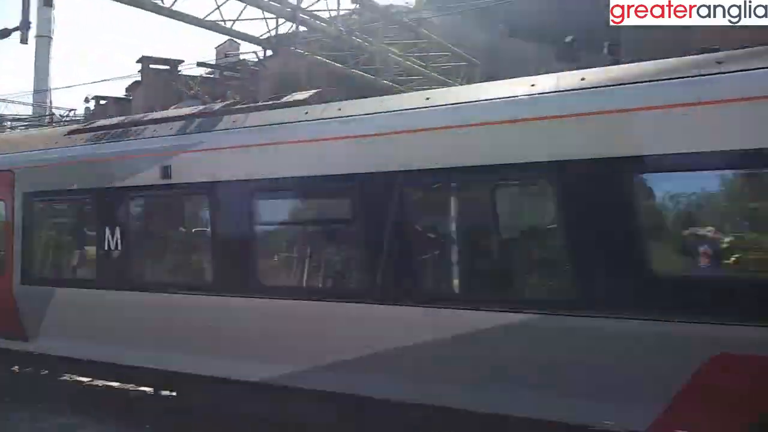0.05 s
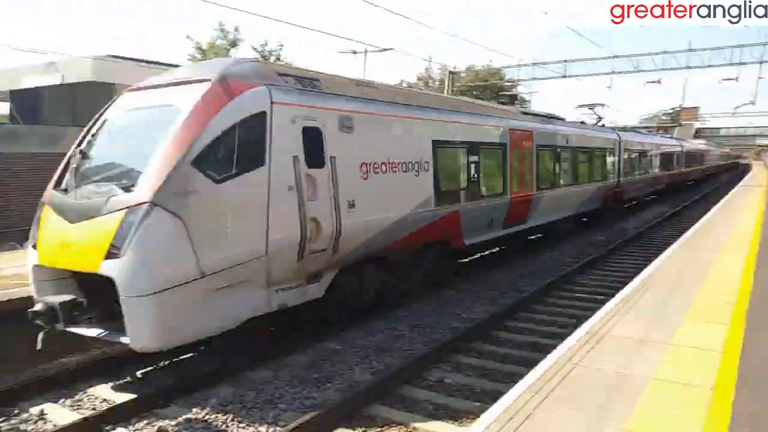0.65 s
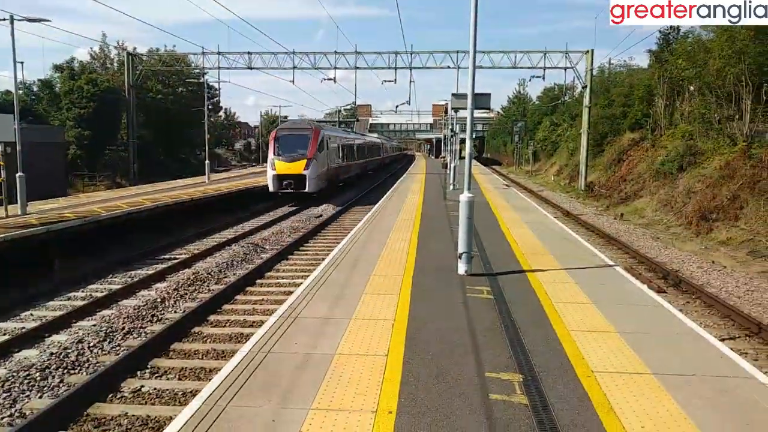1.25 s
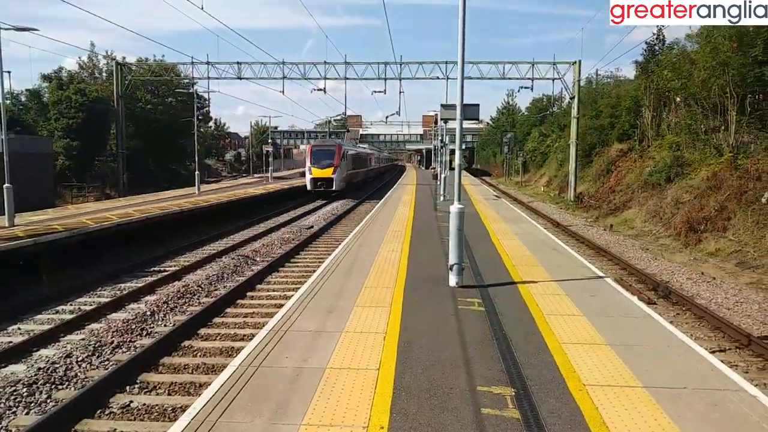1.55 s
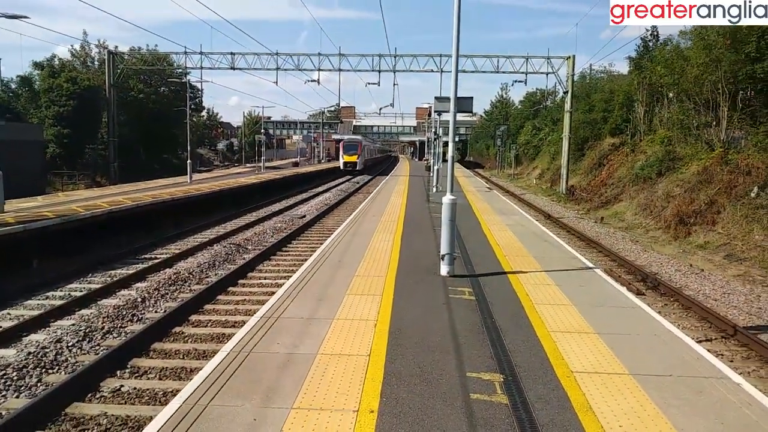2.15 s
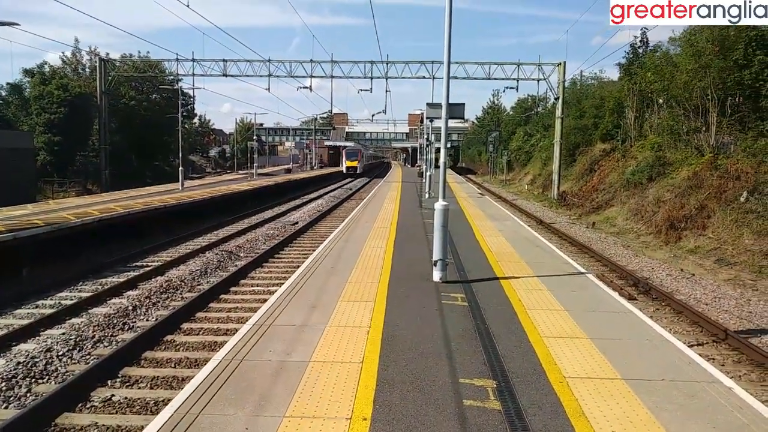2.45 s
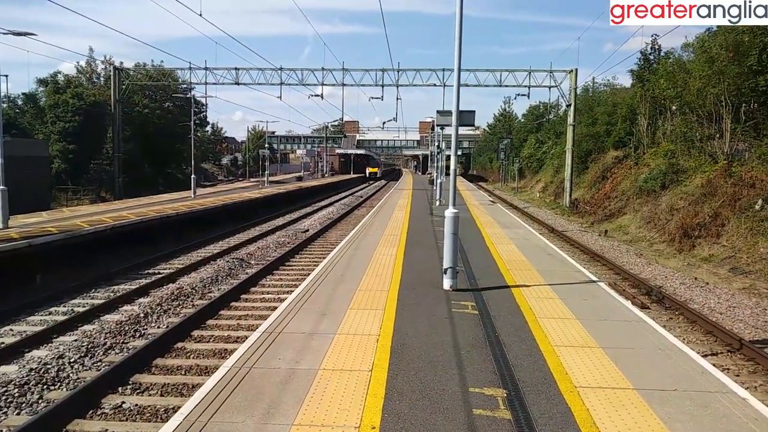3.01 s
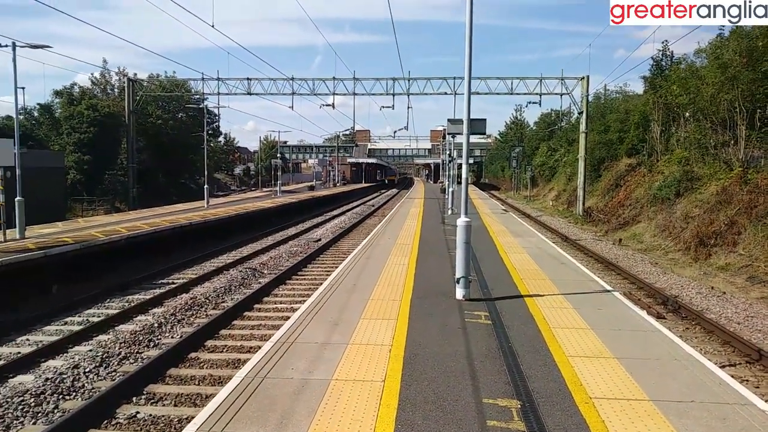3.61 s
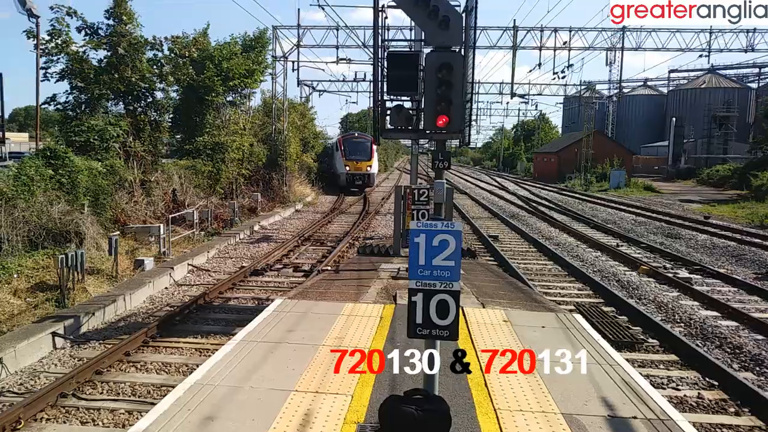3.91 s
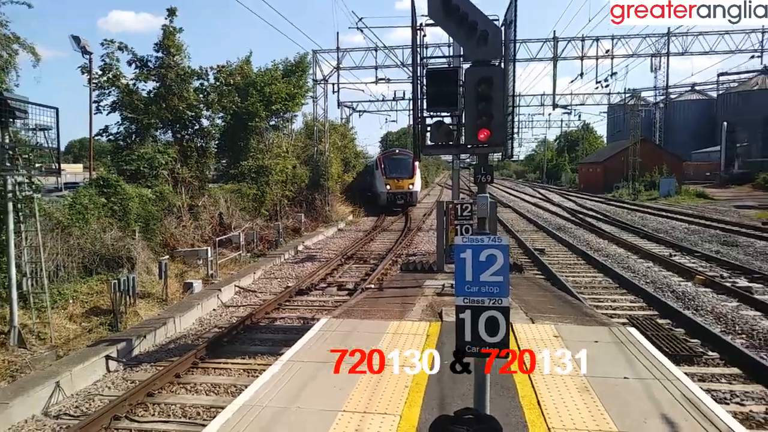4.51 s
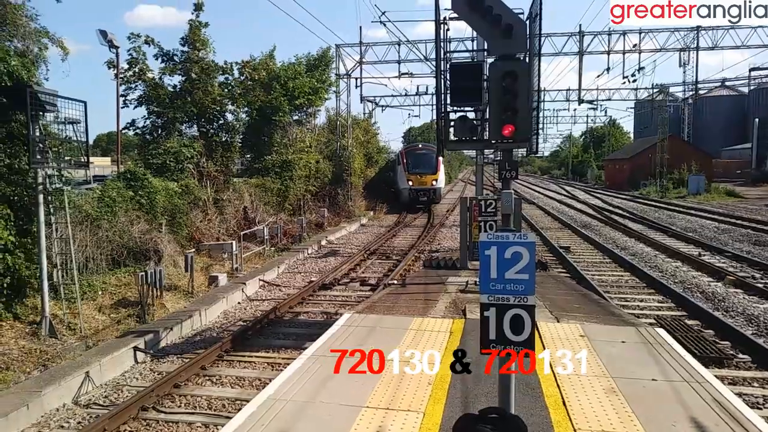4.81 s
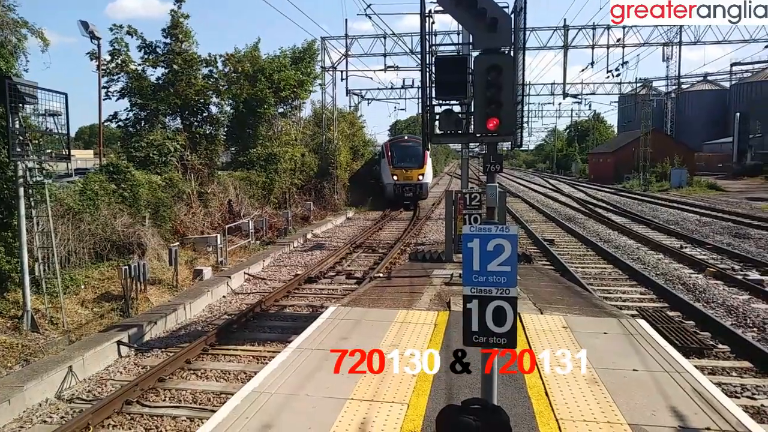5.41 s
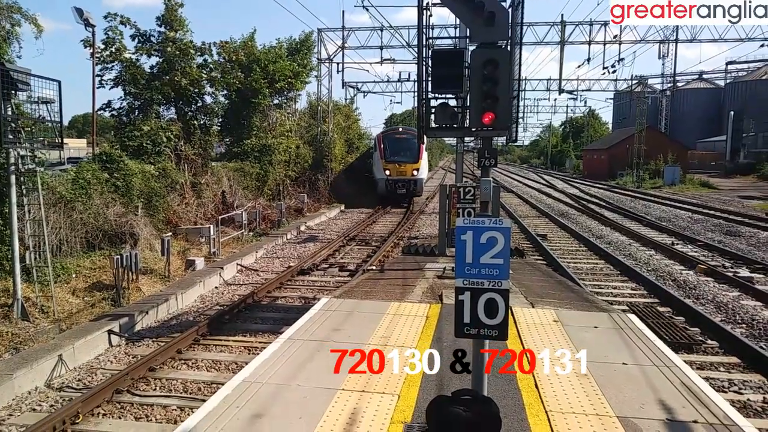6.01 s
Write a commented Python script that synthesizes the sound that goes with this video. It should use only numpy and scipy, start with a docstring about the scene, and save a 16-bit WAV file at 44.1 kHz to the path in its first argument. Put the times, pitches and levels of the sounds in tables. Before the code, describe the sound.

A fast train passes close and fades with ringing rails and wind thumps, followed by far-off wheel squeals over a low drone.

```python
"""Two trains, from platform and yard.

An electric train rushes past a platform, about 7 m from the microphone, and recedes, its wheels and
rails singing; wind buffets the microphone. After a short silence, in a yard, a second train creeps through
distant points: its wheel flanges scrape and squeal in surges over a low drone, with more thumps of wind."""
import sys
import numpy as np
from scipy import signal
from scipy.fft import rfft, irfft
from scipy.io import wavfile
from scipy.ndimage import uniform_filter1d, minimum_filter1d, map_coordinates

SR = 44100
rng = np.random.default_rng(int(sys.argv[2]) if len(sys.argv) > 2 else 0)


def transcribe(signal):
    """Save signal, clipped to [-1, 1], as a 16-bit WAV file at the path in sys.argv[1]."""
    frames = np.atleast_2d(signal).T
    limited = np.clip(frames, -1, 1)
    pcm = np.round(limited * 32767).astype(np.int16)
    wavfile.write(sys.argv[1], SR, pcm)


N = 275915
T = np.arange(N) / SR
HZ = np.fft.rfftfreq(N, 1 / SR)
PLATFORM_END_S, YARD_START_S = 3.843, 3.888
TAIL_S, SPEED_M_PER_S, TRACK_M = 0.73, 25.75, 7.2  # the tail passes at TAIL_S, TRACK_M from the microphone

# Wheel roar at the platform, just past it and far down the line: (frequency [Hz], relative level [dB])
ROAR_NEAR = [(250, 0.5), (600, -1), (870, -4), (1150, -9), (1580, -12), (2000, -12.5), (2450, -12.5),
             (2800, -28), (3200, -34), (3600, -46)]
ROAR_GONE = [(150, -56), (250, -13), (488, -1.5), (683, -5), (834, 0), (933, -4), (1030, -3), (1360, -10),
             (1460, -7.5), (1750, -6.5), (2100, -7), (2980, -24), (3600, -22), (4680, -55), (7920, -120)]
ROAR_FAR = [(150, 5), (250, -5.5), (382, -13), (422, -8.5), (631, -4), (834, -4.5), (933, -7), (1170, -4.5),
            (1470, -7.5), (2040, -12), (2150, -15), (3600, -27), (4680, -28), (7920, -120)]
# Resonances of rails and wheels: (frequency [Hz], width [Hz], prominence before softening [dB])
RAIL_MODES = [(352, 8, 6), (429, 9, 4), (484, 10, 7), (505, 16, 4), (575, 10, 3), (615, 22, 6),
              (768, 10, 4), (824, 8, 13), (866, 20, 2), (1005, 14, 5), (1105, 10, 6), (1201, 14, 7),
              (1490, 14, 6), (1507, 12, 9), (1658, 10, 8), (1730, 12, 6), (1795, 20, 6), (1857, 10, 6),
              (2020, 16, 5), (2068, 12, 8), (2525, 16, 12), (2787, 14, 10)]
# Wheel hiss close up and far off, and the rails' fine fizz: (frequency [Hz], relative level [dB])
HISS_NEAR = [(2600, 7), (2850, 3.5), (3200, -0.5), (3700, 3.5), (4400, 7), (5000, 6.5), (5900, -2),
             (6600, -9.5), (7500, -16), (9000, -18)]
HISS_FAR = [(2600, -28), (3100, 9.5), (3800, 10.5), (4600, 12.5), (5500, 12.5), (6400, -1), (7100, -17),
            (7800, -41), (9000, -30)]
RAIL_FIZZ = [(5600, -1.5), (6400, 12.5), (7400, 2.5), (7900, -3.5), (9500, -4.5), (10500, -11), (11200, -6),
             (13000, -12), (14200, -32), (15700, -10)]


def rolling():
    """Wheels on rails, from the platform: roar, hiss and fizz; the ringing stands out as they leave."""
    roar_band, hiss_band, fizz_band = (500, 2600), (3000, 7000), (8000, 15000)
    roar_db, hiss_db = wheel_levels()
    # the fizz is strongest just behind the train, then dies away
    fizz_db = -44 - 7 * np.maximum(T - 1.13, 0) - 7.5 * np.clip((1.13 - T) / 0.15, 0, 1)
    ring = 1 + sum((amp(db) - 1) * peak(hz, width) for hz, width, db in RAIL_MODES)
    near = doppler(noise(colour(ROAR_NEAR) * ring ** 0.44, roar_band))  # the power softens the ringing
    gone = noise(colour(ROAR_GONE) * ring ** 0.82, roar_band)
    far = noise(colour(ROAR_FAR) * ring ** 0.82, roar_band)
    roar = blend(blend(near, gone, 0.64, 0.857), far, 1.15, 2.57)
    near_hiss = doppler(noise(colour(HISS_NEAR), hiss_band))
    hiss = blend(near_hiss, noise(colour(HISS_FAR), hiss_band), 1.0, 1.08)
    fizz = noise(colour(RAIL_FIZZ), fizz_band)
    wheels = roar * amp(roar_db) + hiss * amp(hiss_db) + fizz * amp(fizz_db)
    return patchy(wheels * amp(0.31 * drift(15)), depth_db=0.98, span_hz=500, span_s=0.06)


# Sets of wheels swing into earshot: (time [s], half length [s], extra roar [dB], extra hiss [dB])
BOGIES = [(0.023, 0.045, 8, 12.5), (0.119, 0.036, 6, 12), (0.184, 0.033, 3.5, 8), (0.255, 0.058, 8, 9),
          (.385, 0.084, 7.5, 8.5), (0.62, 0.09, 3, 4), (0.952, 0.17, 1.5, 4.5)]


def wheel_levels():
    """Roar and hiss in dB: they surge with each bogie, open up behind the tail and fall with distance."""
    distance_m = np.hypot(TRACK_M, SPEED_M_PER_S * np.maximum(T - TAIL_S, 0))
    decades = np.log10(distance_m / TRACK_M)
    screened = np.clip(1 - (T - TAIL_S) / 0.057, 0, 1)  # car bodies hide the wheels from the microphone
    roar_db = -14.5 - 16 * decades - 5.5 * screened
    hiss_db = -28 - 15 * decades - 3.5 * screened
    for s, half, extra_roar_db, extra_hiss_db in BOGIES:
        roar_db += extra_roar_db * bump(s, half)
        hiss_db += extra_hiss_db * bump(s, half)
    return roar_db, hiss_db


# Fall in pitch as the wheels pass the microphone: (time [s], pitch [ratio])
DOPPLER_FALL = [(0, 1.14), (.14, 1.12), (.23, 1.016), (.33, 1.), (.7, 0.96)]


def doppler(x):
    """Doppler shift: a sound runs faster while its wheels approach, slower as they leave."""
    position = np.cumsum(curve(DOPPLER_FALL)) % (N - 1)
    return map_coordinates(x, [position], order=3)


# Car bodies alongside the platform: (frequency [Hz], relative level [dB])
CAR_RUMBLE = [(12, -41), (20, -17), (27, -20), (60, 2), (139, 2), (195, 0.5), (280, -7.5), (382, -12.5),
              (500, -15), (650, -35), (1100, -120)]
# The cars push air ahead of them: (time [s], half length [s], extra rumble [dB])
AIR_SURGES = [(0.071, 0.047, 9), (0.315, .03, 3.5), (0.504, 0.055, 5), (0.696, 0.05, 7.5)]


def cars():
    """Close by, the car bodies rumble, the rail whines under them, and the last car's whoosh sinks."""
    surge_db = sum(db * bump(s, half) for s, half, db in AIR_SURGES)
    rumble_db = -14.5 + surge_db - 34.5 * np.maximum(T - TAIL_S, 0)
    _, hiss_db = wheel_levels()
    whine = noise(peak(2840, width_hz=180)) * amp(hiss_db - 2.5) * np.clip((0.52 - T) / 0.47, 0, 1)
    whoosh_s, octaves_per_s = 0.35, 5.7
    whoosh = gliding(733.4 * 2 ** (-octaves_per_s * (T - whoosh_s)), width_hz=176)
    whoosh *= amp(-10.5) * swell(whoosh_s, length_s=0.21, attack_s=0.11, release_db_per_s=66)
    return noise(colour(CAR_RUMBLE)) * amp(rumble_db) + whine + whoosh


# Modes of the squealing wheels across the yard: (frequency [Hz], width [Hz], relative level [dB])
WHEEL_MODES = [(1290, 110, -15), (2240, 45.7, -3), (3326, 170, -8), (4405, 71.4, 0.5), (5530, 170, -3),
               (6640, 180, -4.5), (7750, 140, -11.5), (8840, 160, -16), (9980, 150, -25), (11050, 110, -24),
               (12130, 100, -43), (13150, 150, -47)]
# Squeals of the wheels: a faint one already ringing as the yard opens, then rubs that set them squealing:
# (start [s], length [s], level [dB], extra for the top modes [dB])
SQUEALS = [(3.883, 0.086, -48.5, -23), (3.953, .375, -33, 2), (4.48, .14, -36, 3.5), (4.73, 0.18, -34, 6)]
# One mode takes over for a moment: (time [s], frequency near it [Hz], extra [dB], half length [s])
MODE_FLARES = [(4.038, 4400, 5, .031), (4.122, 5510, 4.5, 0.094), (4.125, 2225, 4, 0.016),
               (4.176, 4400, 7, 0.027), (4.18, 3330, 9, 0.02), (4.292, 2225, 9, 0.04),
               (4.532, 3330, 15.5, 0.084), (4.606, 5510, 10.5, 0.13), (4.765, 2225, 11, 0.062),
               (4.845, 4400, 11.5, 0.015), (4.905, 3330, 13.5, 0.034), (4.91, 5510, 8.5, 0.056),
               (4.57, 11080, 11, 0.062), (4.85, 13150, 10, .08)]
# The squeal sags as the wheel slows: (time [s], pitch [ratio])
PITCH_SAG = [(3.9, 1.), (4.3, 1.004), (4.6, 1.), (4.75, .991), (4.86, .998), (5.2, .988)]


def squeal():
    """Distant flanges stick and slip: wheel modes squeal, each flaring alone; the upper ones die first."""
    modes = np.zeros(N)
    for hz, width, db in WHEEL_MODES:
        upper = np.clip((hz - 5500) / 3000, 0, 1)  # a harder bite favours the upper modes
        release_db_per_s = 47 + 137 * upper
        bites = [amp(level_db + upper * bright_db) * swell(start, length, 0.065, release_db_per_s)
                 for start, length, level_db, bright_db in SQUEALS]
        flare_db = sum(extra * bump(s, half) for s, f, extra, half in MODE_FLARES if abs(f - hz) < 500)
        waver_hz = width * (0.1165 * drift(63.4) + 0.19 * drift(13.83))
        phase = 2 * np.pi * np.cumsum(hz * curve(PITCH_SAG) + waver_hz) / SR
        whistle = np.cos(phase) * amp(2.6 * drift(33))
        rough_skirt = noise(peak(hz, width) ** 0.67 * np.exp(-((HZ - hz) / 430) ** 2))
        gain = np.max(bites, axis=0) * amp(db + flare_db + 1.4 * drift(11))
        modes += unit(whistle + 1.13 * rough_skirt) * gain
    return modes


# Flange rubs at the distant points: (start [s], length [s], scrape [dB], groan [dB], sizzle [dB])
FLANGE_RUBS = [(3.949, 0.37, -41.5, -42, -69), (4.472, 0.11, -39, -37.5, -72),
               (4.716, 0.18, -34.5, -38.5, -52), (5.001, .16, -45, -32.5, -90),
               (5.323, 0.19, -42.5, -29.5, -75), (5.729, 0.14, -43, -30, -64.5),
               (6.068, .14, -43.5, -30.5, -61)]
# Grinding steel and the dry sizzle on top of it: (frequency [Hz], relative level [dB])
SCRAPE_COLOUR = [(550, -1), (800, -2), (1200, -1.5), (1550, -7.5), (1900, 2), (2500, -4.5), (3000, -6),
                 (3500, -1.5), (4400, 1.5), (5000, 3), (5750, 0.5), (6500, -15.5), (7500, -34), (9000, -52)]
SIZZLE_COLOUR = [(6500, -16), (8300, -5), (9200, 4), (10200, -19), (11200, -10), (13000, -21)]


def flanges():
    """Across the yard each flange rub grinds and sizzles on the rail; the wheel's lowest mode groans."""
    scrape, groan, sizzle = np.zeros((3, N))
    for start, length, scrape_db, groan_db, sizzle_db in FLANGE_RUBS:
        contact = swell(start, length, attack_s=0.039, release_db_per_s=177)
        scrape += amp(scrape_db) * contact
        sizzle += amp(sizzle_db) * contact
        groan += amp(groan_db) * swell(start, length, attack_s=0.039, release_db_per_s=139)
    band = (3450, 4250)
    thin = noise(colour(SCRAPE_COLOUR) / (1 + (2100 / (HZ + 1)) ** 3), band)  # while the wheel squeals
    full = noise(colour(SCRAPE_COLOUR), band)
    grinding = scrape * blend(thin, full, 4.79, 5.2)
    grinding += sizzle * noise(colour(SIZZLE_COLOUR)) * amp(2.3 * drift(300))
    groan *= noise(peak(332, width_hz=49) + 0.45 * peak(424, width_hz=60))
    return groan + patchy(grinding * amp(1.1 * drift(140)), depth_db=2.0, span_hz=860, span_s=0.052)


# Single eddies strike the microphone: (time [s], level [dB], swing frequency [Hz])
EDDIES = [(0.807, -4, 108.9), (1.346, -9.5, 135), (1.978, -12.5, 111), (4.242, -3.5, 137), (4.367, -1, 132),
          (4.434, -4.5, 182), (4.473, -10, 140.6), (4.714, -3, 107), (6.007, -15.5, 110)]


def buffets():
    """Each eddy gives one short swing of pressure and a puff of flutter; the hardest ones crack."""
    thumps = np.zeros(N)
    flutter = noise(peak(225, width_hz=205) / (1 + (HZ / 1500) ** 4))
    crack = noise(peak(580, width_hz=800) / (1 + (HZ / 1400) ** 6))
    for s, db, hz in EDDIES:
        swing = np.sin(2 * np.pi * (T - s) * hz) + amp(-10.5) * flutter
        thumps += amp(db) * bump(s, 0.76 / hz) * swing
        thumps += amp(2 * db - 22) * bump(s, 0.003) * crack
    return thumps


# Wind right on the microphone: (frequency [Hz], relative level [dB])
WIND_COLOUR = [(12, -69), (20, -41), (53, 6), (75, 5.5), (140, 2.5), (215, -6.5), (375, -17), (422, -11.5),
               (455, -24), (497, -16.5), (700, -36), (910, -56), (1540, -120)]
# Gusts on the platform, then in the yard: (time [s], half length [s], level [dB])
GUSTS = [(1.12, 0.077, -31), (1.349, 0.017, -17), (1.924, 0.062, -17), (2.42, 0.23, -28), (2.77, 0.15, -19),
         (2.995, 0.16, -15.5), (3.176, 0.089, -16), (3.45, 0.39, -19.5), (3.644, 0.089, -15.5),
         (3.818, 0.08, -17.5), (4.086, 0.058, -17), (4.24, 0.051, -15.5), (4.37, 0.17, -17.5),
         (4.693, 0.11, -23.5)]


def wind(steady_db, lumps_db, knee_hz):
    """Lumpy low turbulence at the microphone: gusts, weaker below the knee, over a steady flow."""
    gust_gain = np.sqrt(sum((amp(db) * bump(s, half)) ** 2 for s, half, db in GUSTS))
    steady = amp(steady_db) * noise(colour(WIND_COLOUR))
    gusts = gust_gain * noise(colour(WIND_COLOUR) * HZ / np.hypot(HZ, knee_hz))
    return (steady + gusts) * unit(amp(lumps_db * drift(32)))


# The yard's distant wash, and air from the creeping train: (frequency [Hz], relative level [dB])
YARD_WASH = [(45, -19), (70, -4.5), (110, -1.5), (190, -3.5), (280, -13.5), (540, -19.5), (850, -22.5),
             (1400, -35.5), (1600, -53), (2600, -57), (4000, -53)]
AIR_HISS = [(3800, -23), (4500, 5), (5500, 20), (5900, -20), (6500, -43), (8000, -36)]
# Steady machinery in the yard: (frequency [Hz], width [Hz], level [dB])
MACHINE_DRONE = [(61.9, 8.5, -32), (1376, 13, -58)]


def yard():
    """Distant wash, a thin hiss of air that draws nearer, and the drone of machinery."""
    drone = sum(amp(db) * noise(peak(hz, width)) for hz, width, db in MACHINE_DRONE)
    air = amp(-51) * noise(colour(AIR_HISS)) * np.clip((T - 3.9) / 0.6, 0, 1)
    return amp(-31.5) * noise(colour(YARD_WASH)) + air + drone


def platform_hiss():
    """A faint, steady high hiss over the platform."""
    return amp(-58.5) * noise(peak(12400, width_hz=2400) ** 2)


def amp(db):
    """Decibels to gain."""
    return 10 ** (np.asarray(db) / 20)


def unit(x):
    """Scales to rms 1."""
    return x / np.sqrt(np.mean(x ** 2) + 1e-20)


def curve(rows):
    """Points joined by straight lines in time."""
    return np.interp(T, *np.transpose(rows))


def colour(points):
    """Gain at every frequency; it falls steeply past the ends of the points."""
    hz, db = np.transpose(points)
    f = HZ + 1
    gain = amp(np.interp(np.log(f), np.log(hz), db))
    return gain * np.minimum(f / hz[0], 1) ** 2 * np.minimum(hz[-1] / f, 1) ** 6


def peak(hz, width_hz):
    """Gain of a resonance with steep skirts."""
    return 1 / (1 + ((HZ - hz) / (width_hz * 0.78)) ** 2)


def noise(gain, band=None):
    """Noise of a given spectrum with rms 1, overall or inside a band in Hz."""
    spectrum = rfft(rng.standard_normal(N)) * gain
    inside = spectrum if band is None else spectrum * (HZ > band[0]) * (HZ < band[1])
    return irfft(spectrum, N) / np.std(irfft(inside, N))


def drift(rate_hz):
    """Random motion of rms 1, mostly slower than the rate."""
    return noise(1 / (1 + (HZ / rate_hz) ** 4))


def gliding(hz, width_hz):
    """A band of noise whose centre follows a curve."""
    phase = 2 * np.pi * np.cumsum(hz) / SR
    return drift(width_hz) * np.cos(phase) + drift(width_hz) * np.sin(phase)


def patchy(x, depth_db, span_hz, span_s):
    """Turbulence: the level wanders in patches of time and frequency."""
    frames = signal.stft(x, nperseg=512, noverlap=384)[2]
    field = rng.standard_normal(frames.shape)
    field = uniform_filter1d(field, max(1, round(span_hz * 512 / SR)), axis=0)
    field = uniform_filter1d(field, max(1, round(span_s * SR / 128)), axis=1)
    return signal.istft(frames * amp(depth_db * unit(field)), nperseg=512, noverlap=384)[1][:N]


def blend(a, b, start_s, end_s):
    """Passes from one noise to another at even power."""
    share = np.clip((T - start_s) / (end_s - start_s), 0, 1)
    return np.sqrt(1 - share) * a + np.sqrt(share) * b


def swell(start_s, length_s, attack_s, release_db_per_s):
    """Gain that rises, holds to the end of the length, then dies away."""
    rise = np.clip((T - start_s) / attack_s, 0, 1)
    return rise * amp(-release_db_per_s * np.maximum(T - start_s - length_s, 0))


def bump(s, half_length_s):
    """A smooth rise and fall of height 1 around a moment."""
    return np.exp(-((T - s) / half_length_s) ** 2)


def scene():
    """One microphone on the platform, then in the yard, with a short silence between."""
    on_platform = platform_hiss() + rolling() + cars() + wind(steady_db=-29, lumps_db=1.2, knee_hz=35)
    in_yard = flanges() + squeal() + yard() + wind(steady_db=-36, lumps_db=2.5, knee_hz=129)
    ending = np.clip((PLATFORM_END_S - T) / 0.0034, 0, 1)
    opening = np.clip((T - YARD_START_S) / 0.0029, 0, 1) * amp(np.interp(T, [3.89, 4.08], [-3, 0]))
    return (on_platform * ending + in_yard * opening + buffets())[None]


def record(dry):
    """The microphone sheds the deepest bass, a quick limiter holds the peaks, and the top treble is cut."""
    ceiling, window, edge_hz = 0.94, 32, 15700
    heard = signal.sosfilt(signal.butter(2, 30, "highpass", fs=SR, output="sos"), dry)
    overload = np.maximum(abs(heard) / ceiling, 1)
    gain = minimum_filter1d(1 / overload, 2 * window + 1)
    gain = uniform_filter1d(uniform_filter1d(gain, window), window)
    lowpass = signal.firwin(511, edge_hz, window=("kaiser", 9), fs=SR)
    return signal.oaconvolve(heard * gain, lowpass[None], "same")


dry = scene()
out = record(dry)
transcribe(out)
```